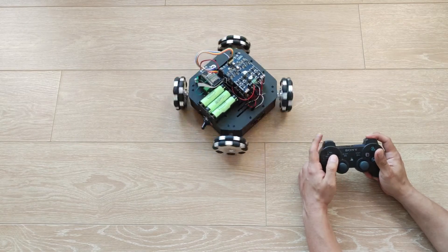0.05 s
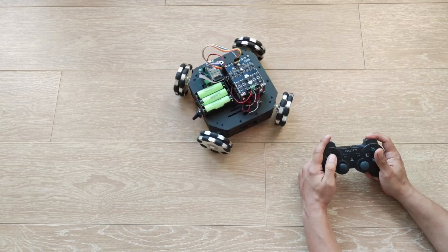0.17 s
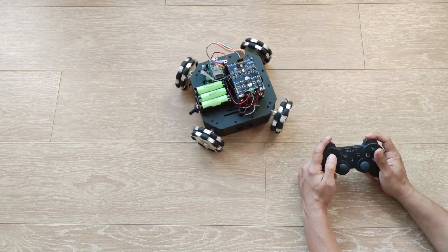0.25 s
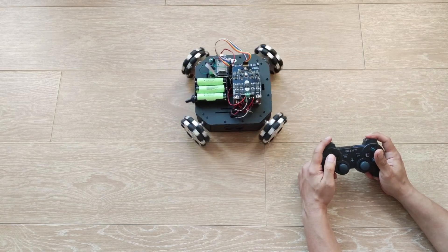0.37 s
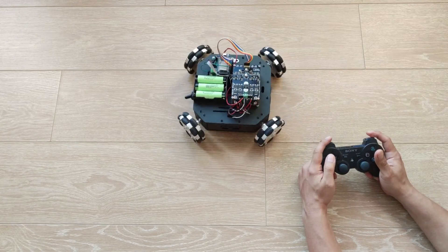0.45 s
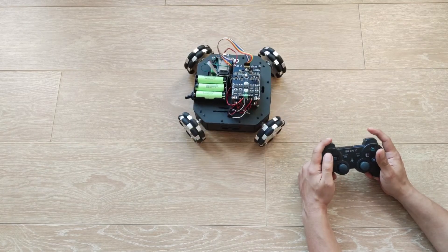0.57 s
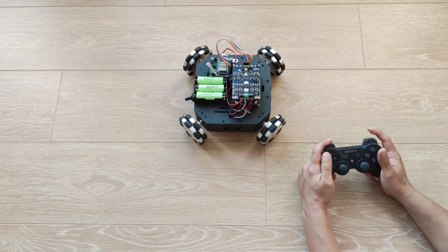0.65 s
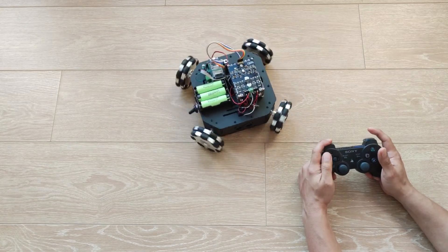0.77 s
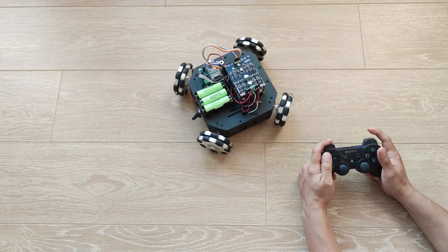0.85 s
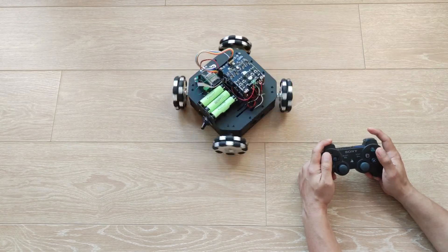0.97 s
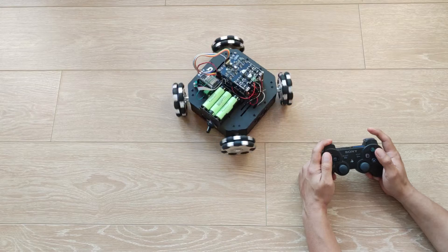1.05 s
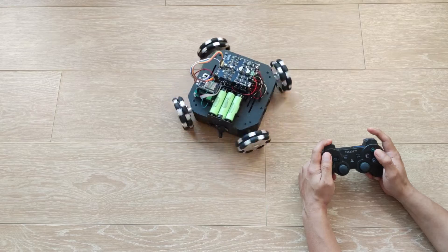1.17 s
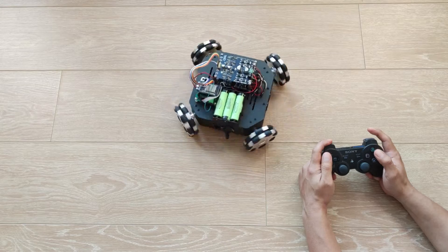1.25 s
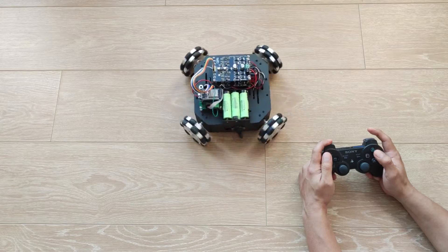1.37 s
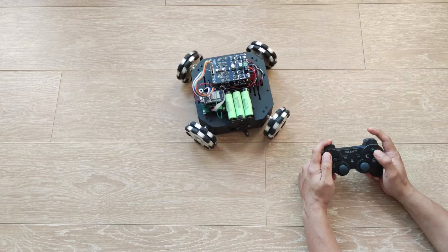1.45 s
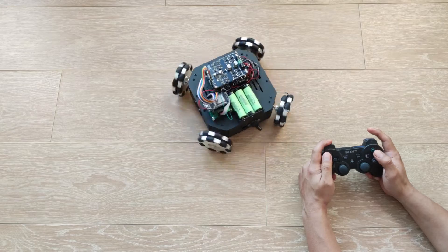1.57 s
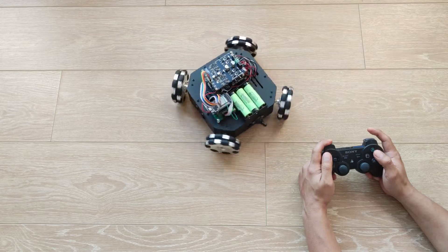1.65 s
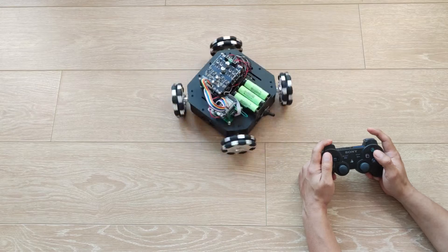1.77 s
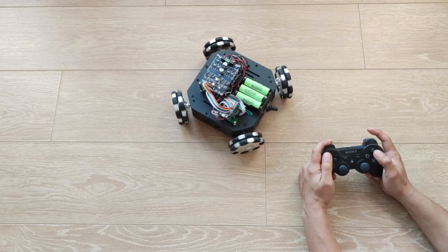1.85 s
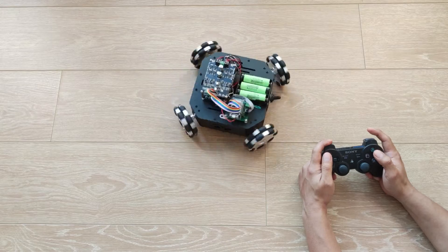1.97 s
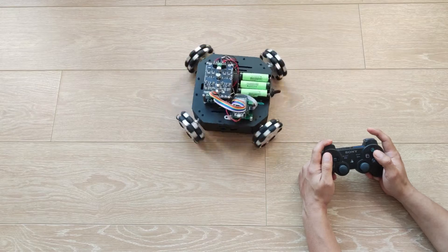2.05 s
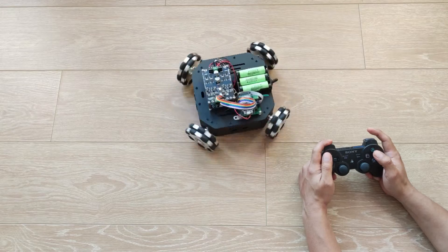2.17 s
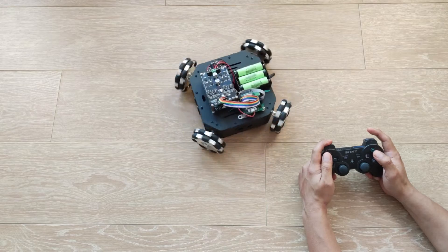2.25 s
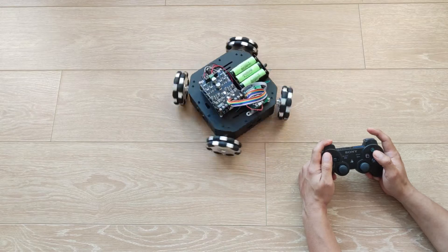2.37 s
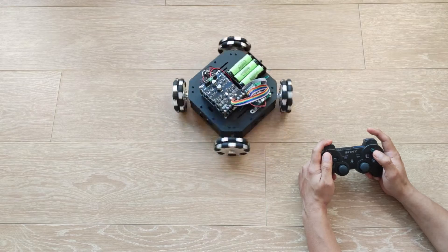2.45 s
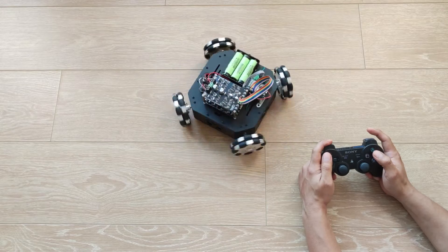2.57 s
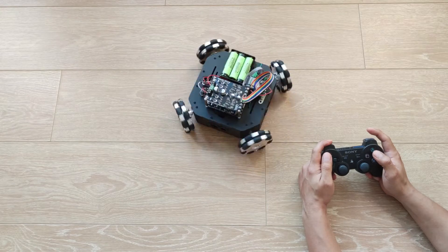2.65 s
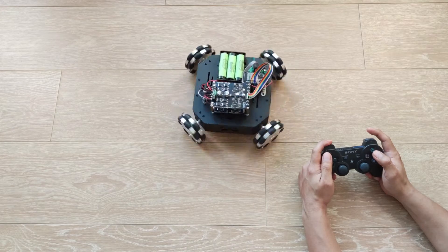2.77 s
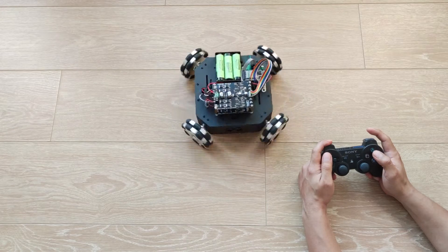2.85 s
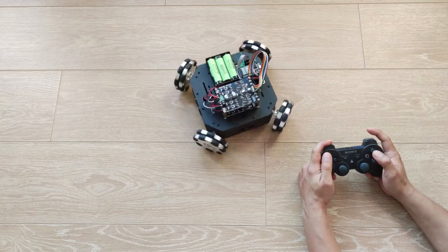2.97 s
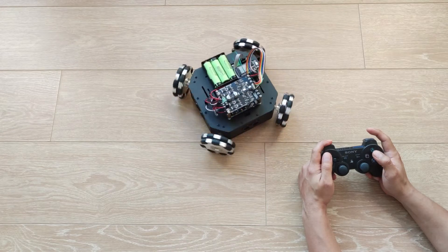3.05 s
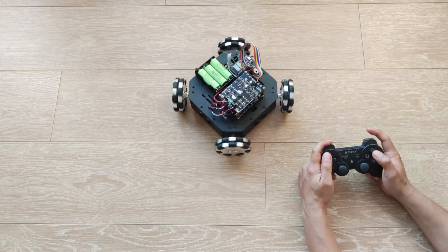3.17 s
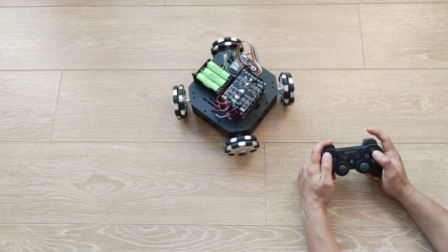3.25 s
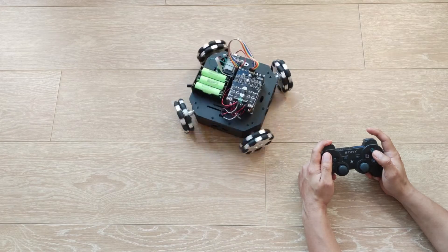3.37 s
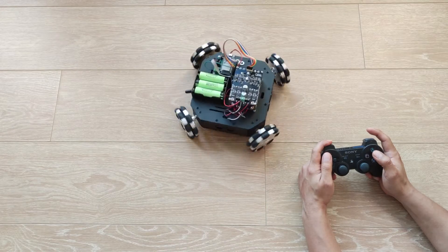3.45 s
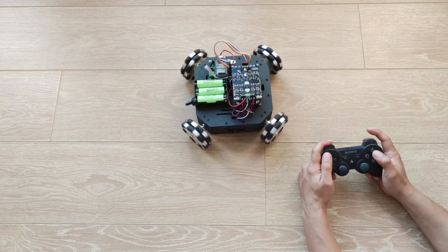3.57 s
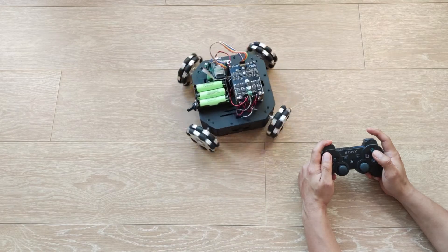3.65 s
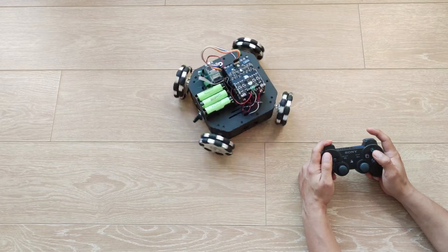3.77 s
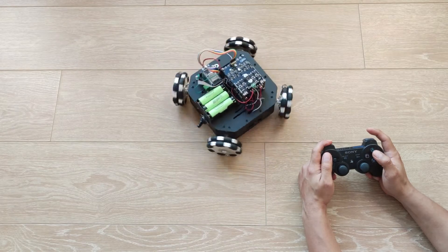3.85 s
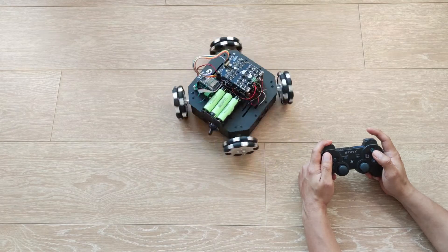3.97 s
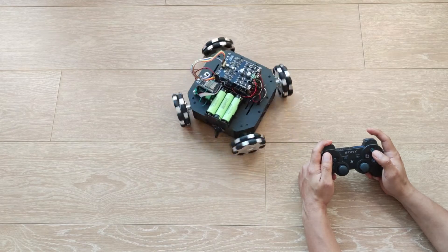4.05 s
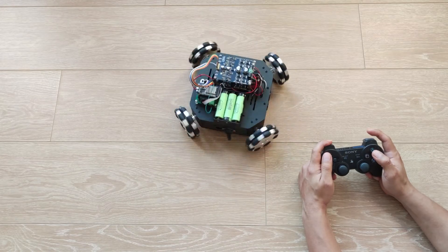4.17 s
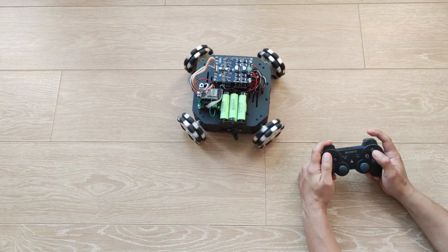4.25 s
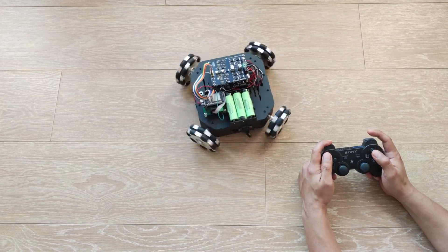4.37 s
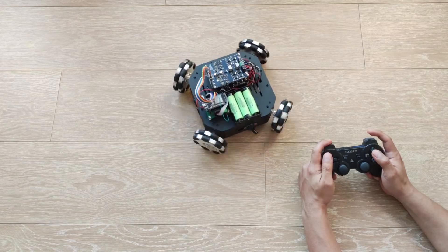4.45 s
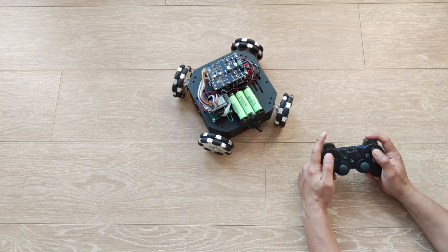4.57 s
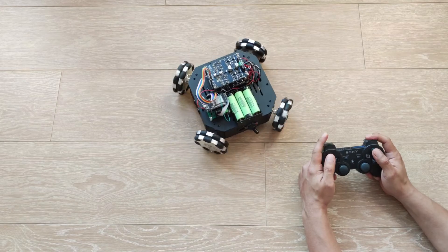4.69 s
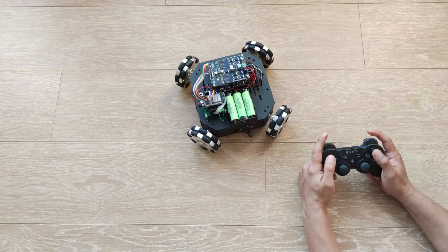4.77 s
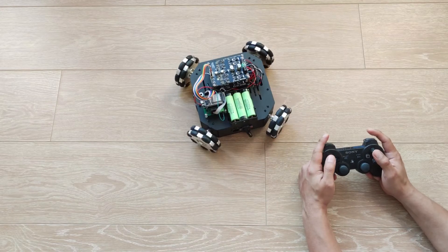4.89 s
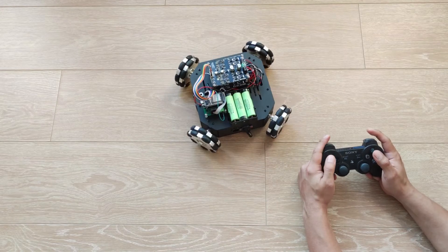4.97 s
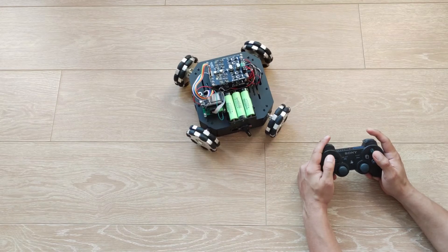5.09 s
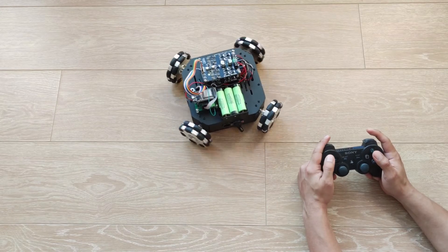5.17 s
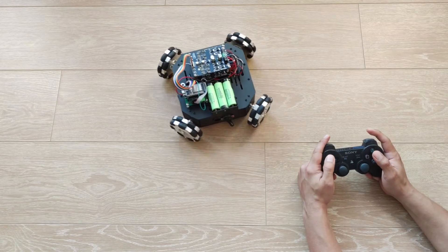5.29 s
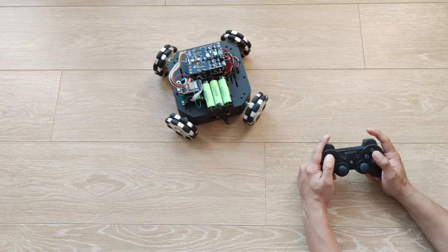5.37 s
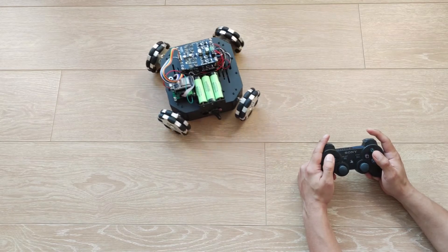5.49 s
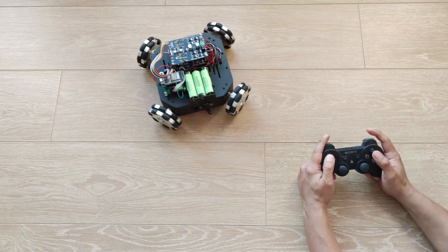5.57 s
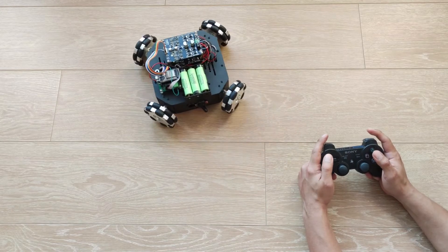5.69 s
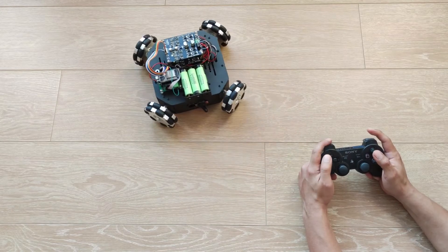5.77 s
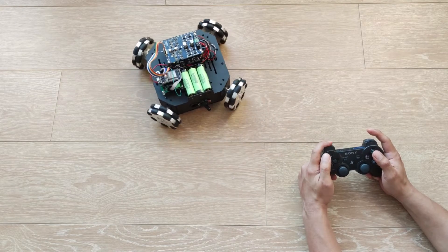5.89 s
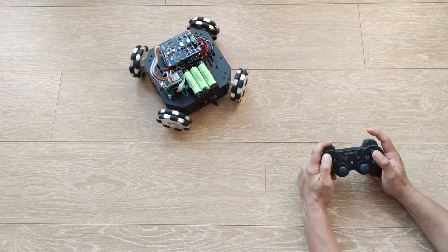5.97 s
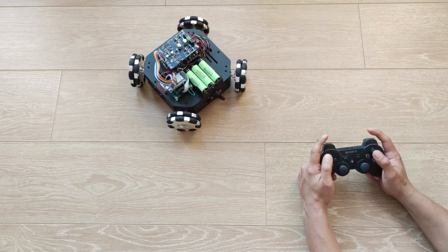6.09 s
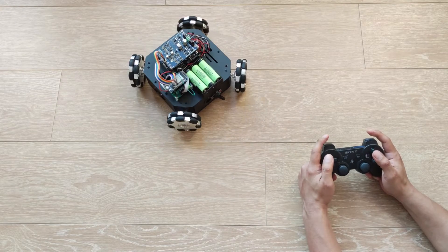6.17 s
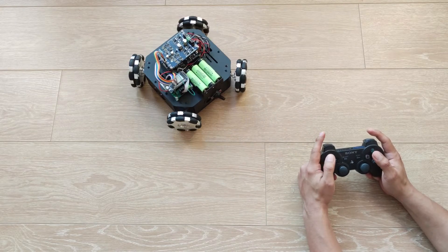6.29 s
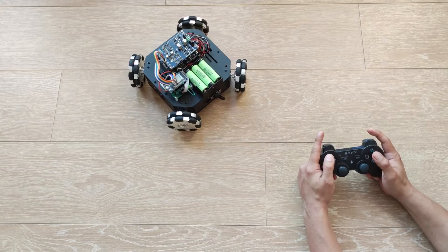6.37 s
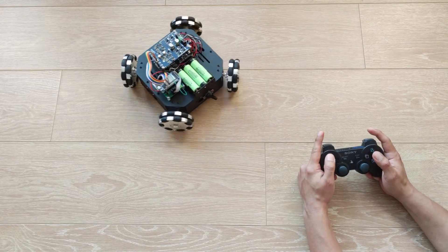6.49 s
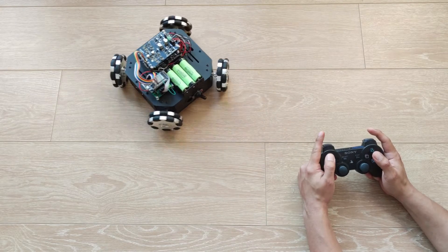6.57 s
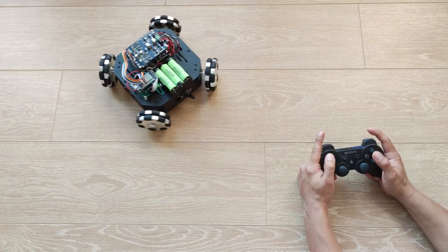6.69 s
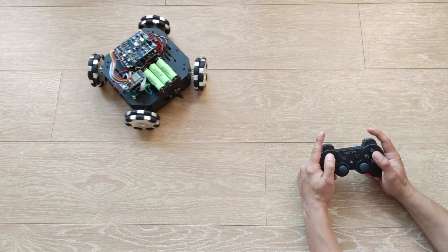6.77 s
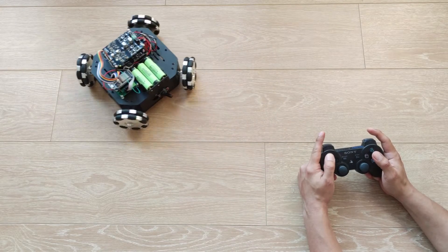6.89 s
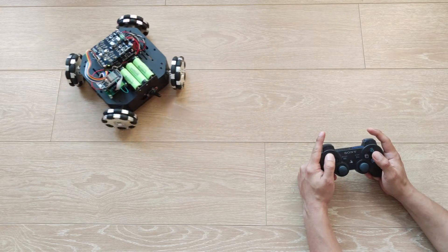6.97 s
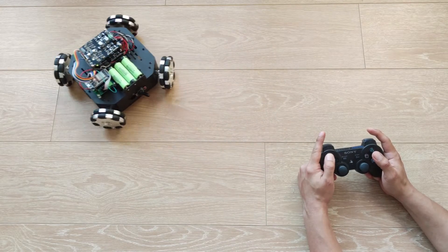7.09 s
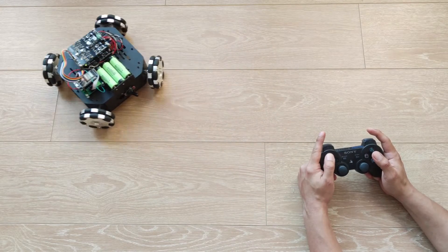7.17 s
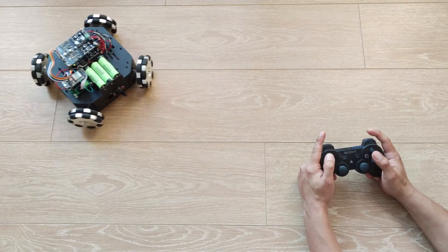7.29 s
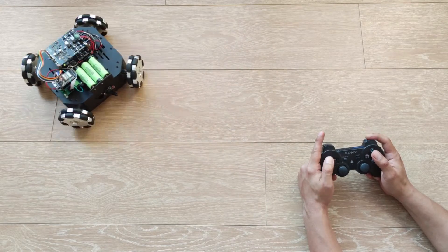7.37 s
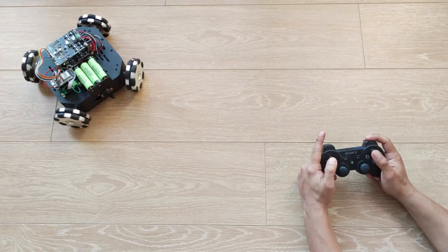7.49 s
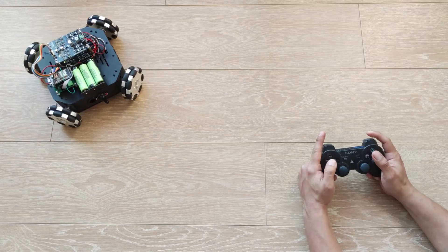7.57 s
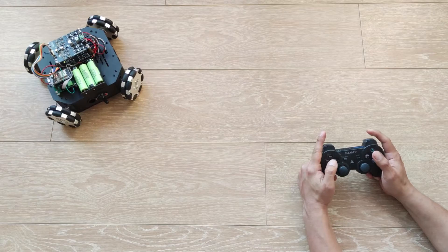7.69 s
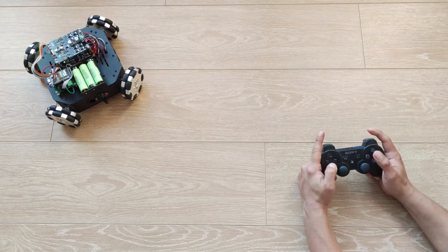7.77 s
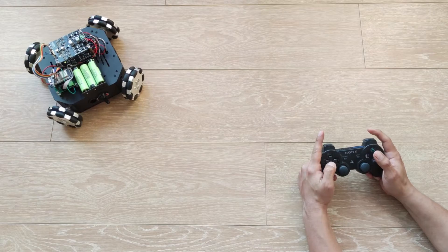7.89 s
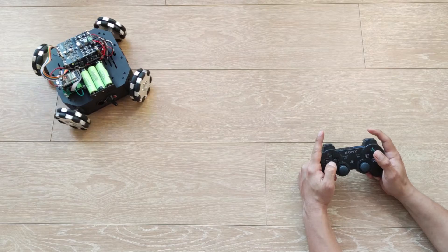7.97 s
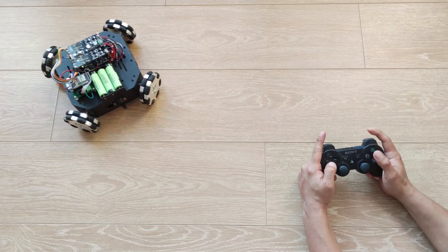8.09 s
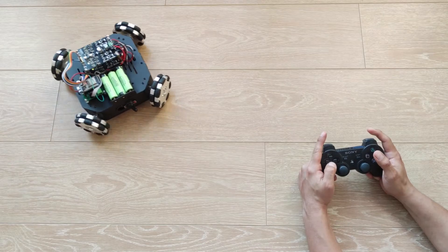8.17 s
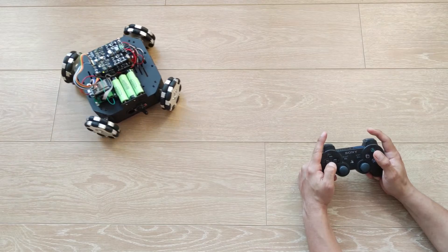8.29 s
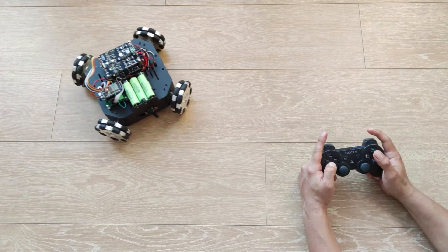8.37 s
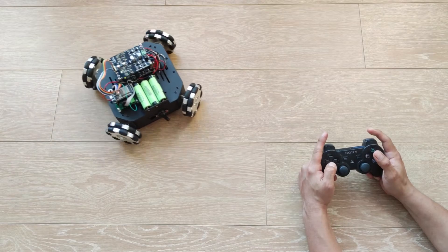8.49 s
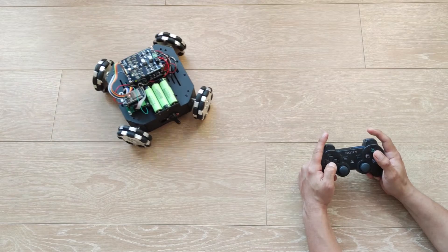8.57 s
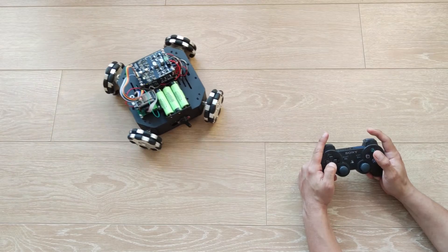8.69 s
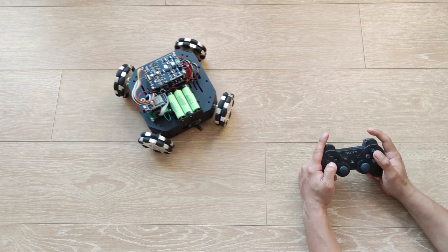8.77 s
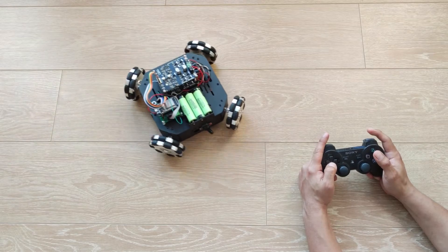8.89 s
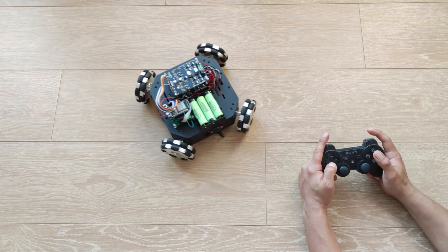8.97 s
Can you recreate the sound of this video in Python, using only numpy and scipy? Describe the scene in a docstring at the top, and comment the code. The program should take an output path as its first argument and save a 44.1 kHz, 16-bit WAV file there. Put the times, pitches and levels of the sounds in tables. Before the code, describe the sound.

A toy-sized wheeled robot buzzes and clatters on a wooden floor, one long throbbing spin followed by brief stop-and-go motor bursts.

```python
"""Roller-wheeled robot on floorboards

In a lively living room, two microphones hear a small robot spin, then drive to and fro in short bursts.
Its gear motors whir and throb, slack teeth rattle and clack, the speed controller whines at its switching
rate; rollers knock on the boards, tick and squeak. Noise pulses and tones pass through resonant bodies,
then chance reflections and a longer tail; faint air noise and a low hum lie behind.
"""
import sys
import numpy as np
from scipy import signal
from scipy.fft import rfft, irfft
from scipy.io import wavfile
from scipy.ndimage import map_coordinates

SR = 44100
rng = np.random.default_rng(int(sys.argv[2]) if len(sys.argv) > 2 else 0)


def dump(signal):
    """Clip the signal to [-1, 1] and save it as 16-bit WAV at the path in sys.argv[1]."""
    limited = np.clip(np.atleast_2d(signal).T, -1, 1)
    pcm = np.round(limited * 32767).astype(np.int16)
    wavfile.write(sys.argv[1], SR, pcm)


N = 398663
TIME = np.arange(N) / SR   # s
SPIN_ENDS_S = 4.68
TAKE_UP_S = .012   # gears take up their slack after a push
TEETH_PER_TURN = 16

# each push of the stick; levels are relative, before each part's own gain:
# start t/s, stop t/s, slow motors' full tooth rate f/Hz, fast motors' full tooth rate f/Hz, whir level/dB,
# housing ring level/dB, whine level/dB, rattle level/dB, braking surge/dB, rumble against rattle/dB
PUSHES = [(-.2, .55, 2192, 2300, -47, -53, -70, -37.5, 1, -1.5),
          (.733, 4.665, 1884, 2276, -49, -79, -65, -38.5, 4.5, 1),
          (4.768, 4.94, 1999, 2398, -42.5, -52, -69, -40, 5.5, 0),
          (5.197, 5.452, 1995, 2345, -44.5, -49.5, -62, -38.5, 3, -2),
          (5.505, 5.775, 2302, 2634, -42.5, -50.5, -63, -38.5, 1, -1.5),
          (5.975, 6.24, 1895, 2311, -44.5, -62, -69, -39.5, 6.5, 0),
          (6.513, 7.515, 2316, 2728, -43, -51, -68, -37.7, .5, -1.5),
          (7.585, 7.73, 2305, 2693, -42.5, -54, -65, -37, 3, -4.5),
          (8.006, 9.19, 1881, 2323, -42.5, -57, -65, -39, 0, -5)]


def from_db(db):
    """Decibels to gain."""
    return 10 ** (np.asarray(db) / 20)


def rms_one(x):
    """Scale to unit power."""
    return x / np.sqrt(np.mean(x ** 2) + 1e-20)


def drift(rate):
    """Smooth chance wavering of spread 1, with rate random knots a second."""
    knots = rng.standard_normal(4000)
    return rms_one(map_coordinates(knots, [TIME * rate], order=2, mode="wrap"))


def response(points):
    """Causal, minimum-phase impulse response of a body with the given colour."""
    size = 4096
    hz, db = np.transpose(points)
    grid = np.maximum(np.arange(size // 2 + 1) * SR / size, 1)
    level_db = np.interp(np.log(grid), np.log(hz), db)
    cepstrum = irfft(np.log(from_db(level_db)))
    # folding the cepstrum forward makes the response start at once
    cepstrum[1:size // 2] *= 2
    cepstrum[size // 2 + 1:] = 0
    return irfft(np.exp(rfft(cepstrum)))


def modes(rows):
    """Impulse response of a few decaying modes."""
    t = TIME[:SR // 2]
    return sum(from_db(db - 60 * t / t60) * np.cos(2 * np.pi * hz * t) for hz, db, t60 in rows)


def through(x, impulse):
    """Pass a sound through an impulse response."""
    return signal.oaconvolve(x, impulse)[:N]


def add(track, s, sound):
    """Mix a short sound in at time s."""
    at = int(np.clip(s * SR, 0, N - 1))
    track[at:at + len(sound)] += sound[:N - at]


def blows(rows, contact_s):
    """Each blow is a flurry of small contacts that gathers quickly and dies."""
    gather_s = .002
    out, t = np.zeros(N), TIME[:SR // 10]
    for s, db in rows:
        envelope = np.exp(-t / contact_s) * (1 - np.exp(-t / gather_s))
        flurry = rng.standard_normal(len(t)) * envelope
        add(out, s - gather_s / 2, from_db(db) * flurry / np.linalg.norm(flurry))
    return out


def drive(spin_up_s, from_share, settle_s, duty_s, lead_s):
    """Motors run up after each push and fall silent on release: tooth rates, then whir, housing and whine gains."""
    rates, gains = np.ones((2, N)), np.zeros((3, N))
    for start, stop, slow_hz, fast_hz, *levels_db, _, _, _ in PUSHES:
        since = TIME >= start - lead_s   # the current flows a moment before the gears move
        age = np.maximum(TIME[since] - start, 0)
        speed = 1 - (1 - from_share) * np.exp(-age / spin_up_s)
        rates[:, since] = np.outer([slow_hz, fast_hz], speed)
        gains[:, since] = np.outer(from_db(levels_db), TIME[since] < stop)
        # gears grow louder as they gather speed
        gains[:2, since] *= speed * (1 - np.exp(-age / TAKE_UP_S))
        # the whine starts stronger by half, then eases
        gains[2, since] *= 1 + .5 * np.exp(-age / duty_s)
    keep = np.exp(-1 / (settle_s * SR))
    return rates, signal.lfilter([1 - keep], [1, -keep], gains + 1e-18)


def shaking():
    """Gears and wheels shake: a soft start builds after each push, braking adds a surge, then it dies away."""
    soft_start_db, build_s, brake_s, coast_db_per_s = -6, .08, 0.024, 215
    waver_db, waver_per_s = 1.26, 28   # chance wavering of the gears alone
    gears, wheels = np.zeros((2, N))
    for start, stop, *_, rattle_db, brake_db, rumble_db in PUSHES:
        age = np.maximum(TIME - start, 0)
        build = soft_start_db * np.exp(-age / build_s)
        brake = brake_db * np.exp(-((TIME - stop) / brake_s) ** 2)
        coast = coast_db_per_s * np.clip(TIME - stop, 0, 1)
        run = (1 - np.exp(-age / TAKE_UP_S)) * from_db(rattle_db + build + brake - coast)
        gears += run
        wheels += run * from_db(rumble_db)
    return gears * from_db(waver_db * drift(waver_per_s)), wheels


def gear_whir(rates, whir, housing, wobble, rough, tone_db, swell_db, swell_s, flutter_db):
    """Four pinions mesh; uneven teeth repeat every turn and give side tones, all ringing in the gearboxes."""
    # colour of the gearboxes: f/Hz, relative level/dB
    gearbox = [(300, -19.5), (700, -6), (1150, -38.5), (1400, -8.5), (1650, -4.5), (1850, 0.5),
               (2100, -0.5), (2240, 0.5), (2335, 5), (2430, 1), (2760, -1), (2900, -16), (4000, -9),
               (15000, -22.5)]
    # narrow resonance of the gearbox housings: f/Hz, relative level/dB
    housing_colour = [(2950, -15.5), (3330, 4.5), (3750, 1), (6000, -61)]
    # an off-centre gear binds once a turn while spinning: first bind t/s, last bind t/s, one turn/s
    spins = [(.2, .5, .149), (.83, 4.51, .1363)]
    taps, tone = np.zeros(N), np.zeros(N)
    for rate in (*rates, *rates):
        teeth = np.cumsum(rate * (1 + wobble * drift(35))) / SR
        tooth = teeth.astype(int)
        wear = rng.standard_normal(size=TEETH_PER_TURN)
        tap_size = wear[tooth % len(wear)] + rough * rng.standard_normal(N)
        taps += np.diff(tooth, prepend=0) * tap_size
        tone += np.sin(2 * np.pi * teeth) * from_db(3.1 * drift(40))
    mesh = rms_one(taps) + from_db(tone_db) * rms_one(tone)
    mesh = mesh * from_db(flutter_db * drift(35))
    binding = np.zeros(N)
    for first, last, turn_s in spins:
        for s in np.arange(first, last + turn_s / 2, turn_s):
            binding += rng.uniform(0.55, 1.05) * np.exp(-((TIME - s) / swell_s) ** 2)
    boxes = whir * rms_one(through(mesh, response(gearbox))) * from_db(swell_db * binding)
    return boxes + housing * rms_one(through(mesh, response(housing_colour)))


def gear_rattle(shake, per_s, spread_db, flutter_db, bursts_per_s, burst_s, burst_size):
    """Slack teeth chatter in sudden, dying bursts of tiny clicks that set the motor cans ringing."""
    # colour of the chattering teeth: f/Hz, relative level/dB
    teeth_colour = [(400, -12), (900, -9), (1200, -8.5), (1500, -6), (2500, -5), (3000, -8.5), (3900, 1),
                    (4700, -2), (6500, -2.5), (7350, 1.5), (8100, -5), (9500, -7), (11500, -14),
                    (15800, -16)]
    # modes of the metal motor cans: f/Hz, relative level/dB, t60/s
    cans = [(2335, -61, 0.53), (3930, -68, .7), (4100, -70, .45), (4170, -66, .4)]
    sizes = from_db(spread_db * np.minimum(rng.exponential(1, N), 4)) * rng.choice([-1, 1], N)
    jolts = (rng.random(N) < bursts_per_s / SR) * rng.random(N)
    dying = signal.lfilter([1], [1, -np.exp(-1 / (burst_s * SR))], jolts + 1e-18)
    bursts = np.sqrt(1 + burst_size * dying)
    clicks = sizes * (rng.random(N) < per_s / SR) * bursts * from_db(flutter_db * drift(200))
    chatter = rms_one(through(clicks, response(teeth_colour))) * shake
    return chatter + through(chatter, modes(cans))


def rollers(shake, spinning, knock_db, bump_db, ring_db, boom_db):
    """Knocks and bumpy rolling shake the boards and the chassis; spinning on the spot makes the floor boom."""
    # rollers landing hard: t/s, relative level/dB
    knocks = [(0.111, -27.5), (0.306, -34), (1.25, -29), (1.383, -33.5), (1.981, -35), (2.184, -38),
              (2.317, -38), (2.603, -34), (3.046, -29), (3.099, -31), (3.239, -29), (3.369, -25),
              (3.625, -31.5), (3.76, -33.5), (5.408, -29.5), (5.756, -30), (5.953, -38), (5.99, -34.5),
              (6.207, -35), (7.187, -32), (7.623, -34), (8.01, -29)]
    # colour of the floorboards: f/Hz, relative level/dB
    boards = [(35, -18.5), (85, 1), (120, -3.5), (165, -13.5), (270, -4), (340, 0), (450, 4), (560, -4.5),
              (700, -6.5), (900, -12), (8000, -44)]
    # chassis and floor modes: f/Hz, relative level/dB, t60/s
    chassis = [(211.4, -9.5, 0.29), (330.7, -5, 0.37), (391.4, -0.5, 0.19), (442.2, 0.5, 0.27)]
    handover = np.cumsum(14.8 + 2 * drift(9.2)) / SR % 1   # each roller takes the weight in turn
    rolling = shake * from_db(bump_db * (.5 - handover))
    force = from_db(knock_db) * blows(knocks, contact_s=0.0045) + rolling * rng.standard_normal(N)
    boom_band = signal.butter(2, [52, 240], "band", fs=SR, output="sos")
    boom = signal.sosfilt(boom_band, rolling * spinning * rng.standard_normal(N))
    ring = from_db(ring_db) * through(force, modes(chassis))
    return through(force, response(boards)) + ring + from_db(boom_db) * boom


def snaps(shake, clack_db, ticks_per_s, tick_db, tick_spread_db, tick_s):
    """Gear slack snaps shut now and then; loose rollers tick against their pins by chance as the robot shakes."""
    # slack snapping shut, in one clack or a longer judder: t/s, relative level/dB, decay/s
    clack_rows = [(0.336, -19.5, 0.013), (0.7178, -35, .008), (1.858, -19, 0.019), (2.445, -17.5, 0.021),
                  (2.828, -18, 0.021), (2.9064, -21, 0.0048), (3.046, -10.5, 0.0068), (3.105, -17.5, .025),
                  (3.37, -14, 0.029), (4.0282, -13.5, 0.014), (5.4122, -15.5, 0.0041),
                  (5.9537, -32, 0.0097), (5.98, -32, .006), (6.149, -20.5, .007), (6.5166, -34, 0.0082),
                  (8.0114, -26, 0.0083), (8.627, -20, 0.0062)]
    # colour of hard plastic snapping together: f/Hz, relative level/dB
    plastic = [(400, -8.5), (1300, -10.5), (2800, -5.5), (4000, 2.5), (6300, 0), (8000, -8), (11500, -14.5),
               (15800, -14)]
    chances = rng.random((400, 3))
    ticks = [(when * TIME[-1], tick_db + tick_spread_db * size)
             for keep, when, size in chances if keep < ticks_per_s * TIME[-1] / len(chances)]
    clacks = sum(blows([(s, db)], decay_s) for s, db, decay_s in clack_rows)
    return through(from_db(clack_db) * clacks + shake * blows(ticks, tick_s), response(plastic))


def squeaks(shake, length_s, glide, rough, small_per_s, small_db):
    """A roller slips for a few milliseconds in a rough rising chirp; small slips come by chance as it rolls."""
    # rubber rollers slipping: t/s, peak level/dB ahead of the room, middle pitch f/Hz
    slips = [(0.4737, -25, 7000), (0.9032, -25.5, 5630), (4.2847, -25.5, 5020), (6.0746, -29, 7780),
             (8.2461, -31, 5300), (8.419, -25, 5740), (8.5577, -22, 6213)]
    out, t = np.zeros(N), TIME[:SR // 40]
    chances = rng.random((400, 4))
    small = [(when * TIME[-1], 20 * np.log10(shake[int(when * N)]) + small_db + 6 * size, 3800 + 3400 * high)
             for keep, when, size, high in chances if keep < small_per_s * TIME[-1] / len(chances)]
    for s, db, hz in [*slips, *small]:
        age = t / length_s
        pitch = hz * (1 + glide * np.tanh(age - 1) + rough * rng.standard_normal(len(t)))
        chirp = np.sin(2 * np.pi * np.cumsum(pitch) / SR)
        add(out, s - .001, from_db(db) * age ** 2 * np.exp(1 - age ** 2) * chirp)
    return out


def windings(rate, whine, hum):
    """The controller's pulses sing in the windings; the rotor hums at multiples of its turning rate."""
    switching_hz = 1000
    switching = 2 * np.pi * switching_hz * TIME
    pulses = np.sin(switching) + 0.33 * np.sin(2 * switching)
    turn = 2 * np.pi * np.cumsum(rate * (1 + .003 * drift(12))) / SR / TEETH_PER_TURN
    rotor = np.zeros(N)
    for order, db in zip(range(5, 9), [-6, -5, -9, 0]):
        rotor += from_db(db + 2 * drift(9)) * np.sin(order * turn)
    return whine * from_db(2 * drift(12)) * pulses + hum * rotor


def room(x, early_t60, late_t60, late_db):
    """Each microphone gets the direct sound, quick reflections that shift by chance, and a longer tail."""
    # colour of the echo against the direct sound: f/Hz, relative level/dB
    echo_colour = [(300, -12), (700, -5), (1200, -5), (2000, 1), (4500, 2), (8000, -3.5), (14000, -7.5)]
    # left microphone minus right: f/Hz, level/dB
    sides = [(200, .5), (2500, -0.5), (4500, 4), (7000, -7), (9000, -9), (13000, -3)]
    t, out = TIME[:SR // 2], []
    fade = from_db(-60 * t / early_t60) + from_db(late_db - 60 * t / late_t60)
    fade = fade * (t > .001)   # no echo in the first millisecond
    sent = through(x, response(echo_colour))
    for sign in (1, -1):
        paths = [through(sent, fade * rng.standard_normal(len(t))) / np.linalg.norm(fade) for _ in range(4)]
        shares = np.array([drift(10) for _ in paths])
        echo = np.sum(paths * shares, axis=0) / np.linalg.norm(shares, axis=0)
        out.append(through(x + echo, response([(hz, sign * db / 2) for hz, db in sides])))
    return np.array(out)


def arrival(pair, below_hz):
    """The body of the sound reaches the left microphone a little late; the top stays in step."""
    # lag of the left microphone: t/s, lag/samples
    lag = [(1, 1.5), (6, 2.5), (7.7, 6), (9, 4.5)]
    low = signal.sosfiltfilt(signal.butter(2, below_hz, fs=SR, output="sos"), pair[0])
    late = map_coordinates(low, [np.arange(N) - np.interp(TIME, *np.transpose(lag))], order=1)
    return np.array([pair[0] - low + late, pair[1]])


def room_air(air_db, hum_db):
    """Faint noise, partly shared by the two microphones, over a low wavering hum."""
    # colour of the room's background: f/Hz, relative level/dB
    air = [(24, -16.5), (40, -1.5), (108, -17), (233, -10), (284, -17.5), (804, -25), (15000, -40)]
    mid, side = (rms_one(through(rng.standard_normal(N), response(air))) for _ in range(2))
    hum_phase = 2 * np.pi * np.cumsum(56 + 2 * drift(11)) / SR
    hum = from_db(hum_db + 1 * drift(4.2)) * np.sin(hum_phase)
    return from_db(air_db) * (mid + 0.54 * side * np.array([[1], [-1]])) + hum


def scene():
    """The robot's parts sound together in the room."""
    rates, (whir, housing, whine) = drive(spin_up_s=.06, from_share=.75, settle_s=0.0013, duty_s=0.33, lead_s=.012)
    shake, wheels = shaking()
    spinning = TIME < SPIN_ENDS_S
    robot = from_db(-1.27) * gear_whir(rates, whir, housing, wobble=.014, rough=1.0, tone_db=-17,
                                       swell_db=9, swell_s=0.021, flutter_db=1.16)
    robot += from_db(-4.5) * gear_rattle(shake, per_s=3000, spread_db=0.0, flutter_db=0.94,
                                         bursts_per_s=35, burst_s=0.011, burst_size=1.7)
    robot += rollers(wheels, spinning, knock_db=29.5, bump_db=13, ring_db=-51.5, boom_db=-2)
    robot += snaps(shake, clack_db=14, ticks_per_s=15, tick_db=21, tick_spread_db=12.5, tick_s=0.0031)
    robot += squeaks(shake, length_s=.0025, glide=0.096, rough=0.26, small_per_s=3, small_db=5.5)
    robot += windings(rates[1], whine, hum=from_db(-23) * shake * spinning)
    heard = room(robot, early_t60=.085, late_t60=0.44, late_db=-10.5)
    return arrival(heard, below_hz=3360) + room_air(air_db=-59.5, hum_db=-63)


def record(dry):
    """A steep low-pass cuts the top."""
    cutoff_hz = 15750
    return signal.sosfilt(signal.ellip(12, .1, 80, cutoff_hz, fs=SR, output="sos"), dry)


dry = scene()
out = record(dry)
dump(out)
```